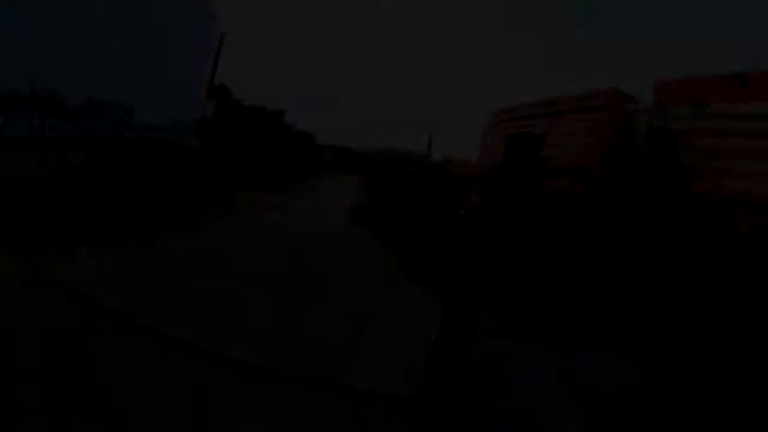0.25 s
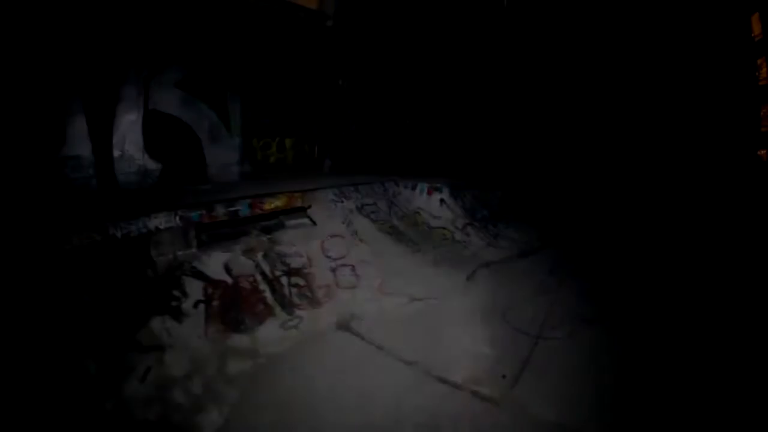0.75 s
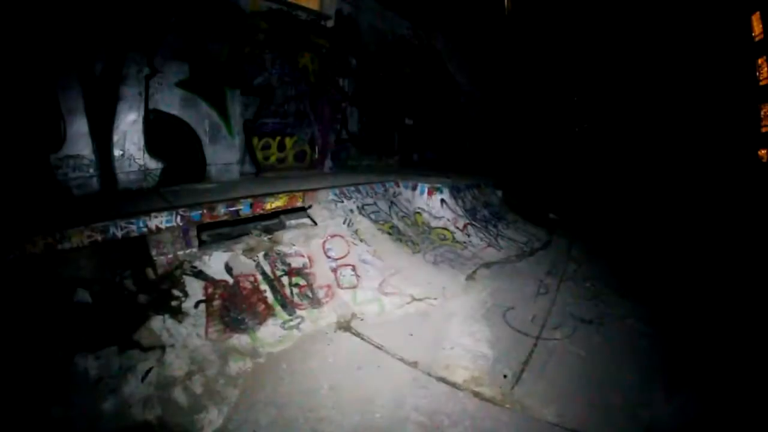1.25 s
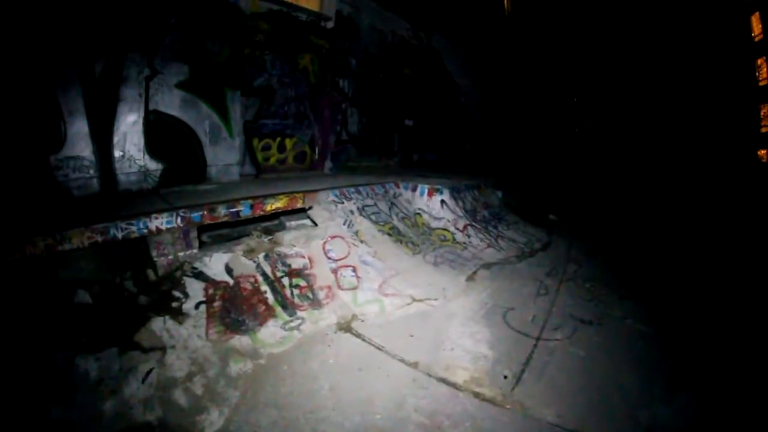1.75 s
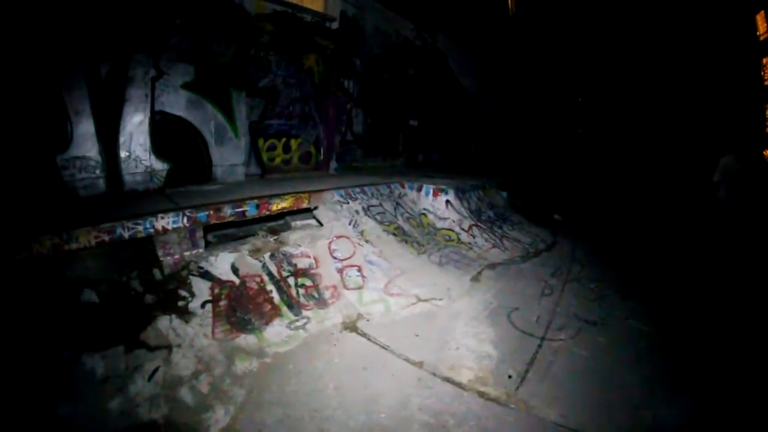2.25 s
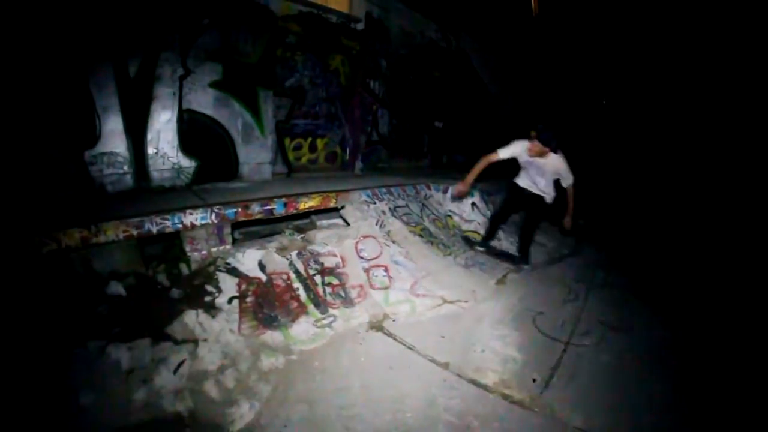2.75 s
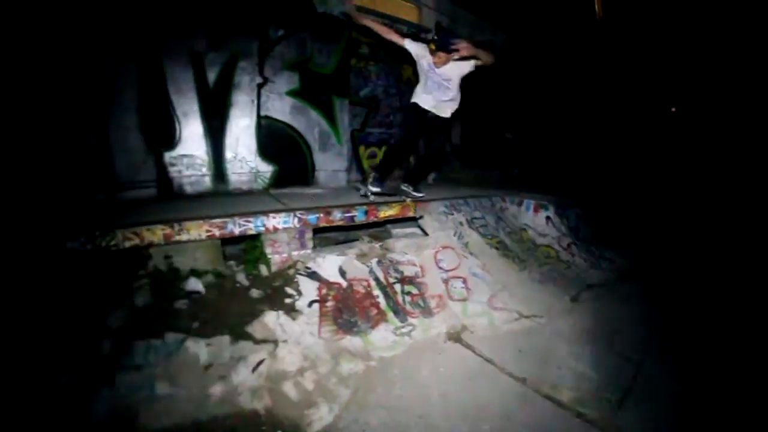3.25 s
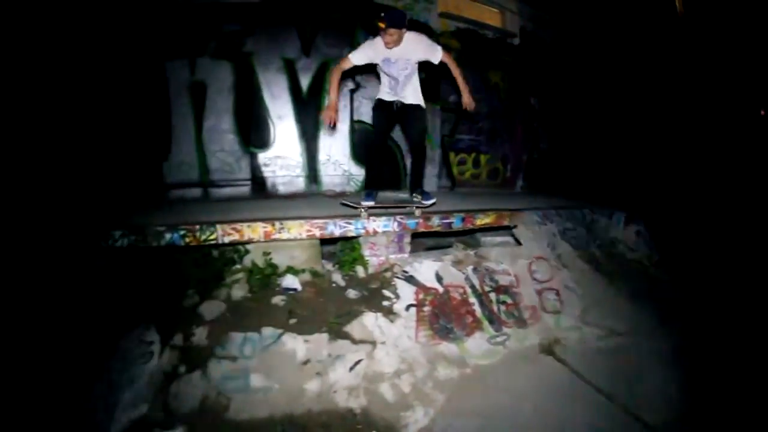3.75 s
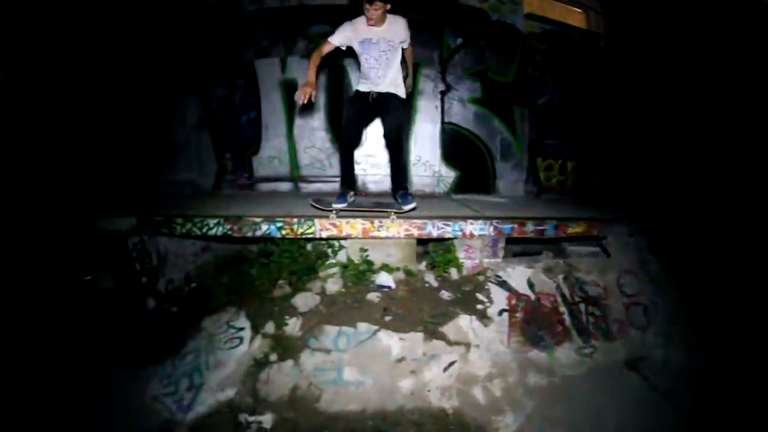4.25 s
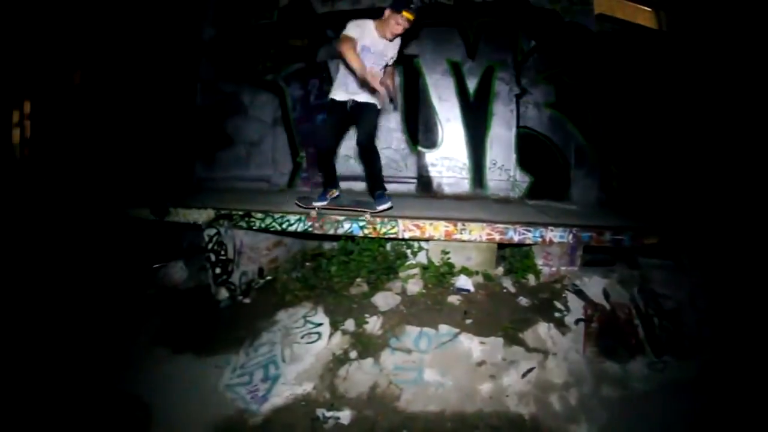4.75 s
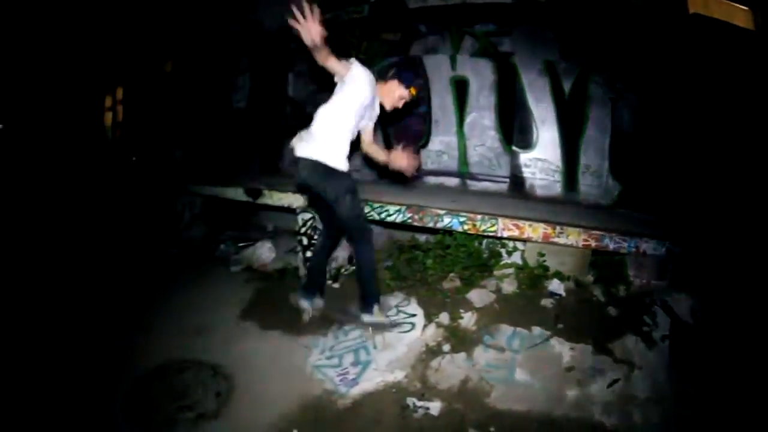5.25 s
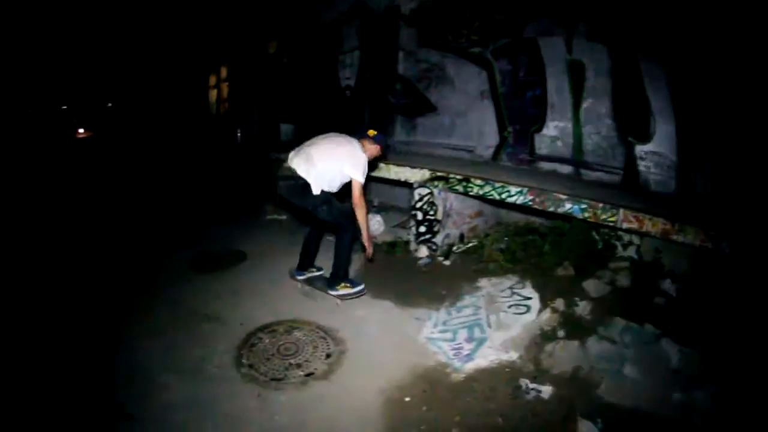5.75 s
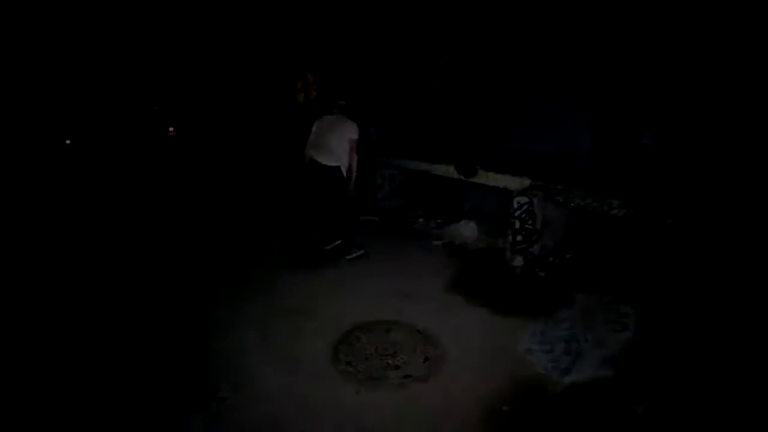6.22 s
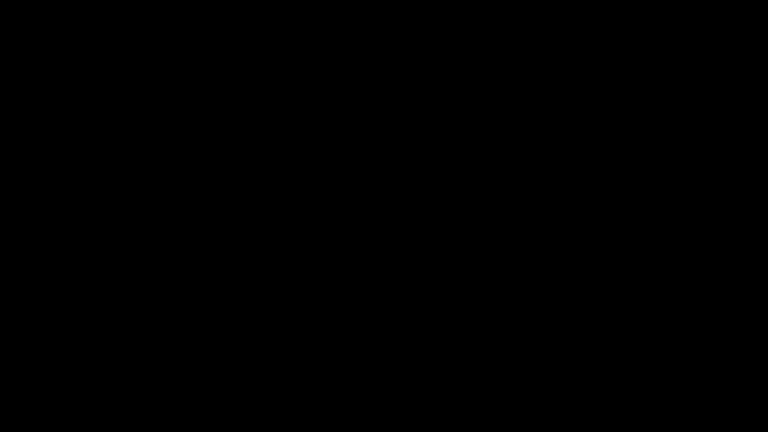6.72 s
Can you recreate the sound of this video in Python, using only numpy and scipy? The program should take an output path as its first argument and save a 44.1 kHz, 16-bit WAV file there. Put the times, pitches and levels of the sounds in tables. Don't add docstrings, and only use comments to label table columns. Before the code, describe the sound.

A faint town hum, wind buffets and dry grass crackle open the sound, dropping nearly silent around 0.45 s with a tiny rattle. Quiet air returns. From 1.25 to 1.6 s a skateboard is handled and set down: short shoe scuffs, metallic ticks and woody knocks. Wheels then rumble over rough concrete, hollow and plank-like, growing steadily closer; knocks and jolts thicken from 2.35 to 3 s up a bank. At 3.2 s two sharp clacks strike the ledge, another pair at 3.45 s, then much quieter gritty rasp, light ticks and flicked stones until 4.8 s. Clicks and a skid at 4.85-5.1 s lead to a near-quiet flight. At 5.37 s a very loud cluster of wooden and metallic cracks lands with low thuds. Rough rolling continues, softer, with clacks near 6.15 and 6.28 s, fading out by 6.6 s. Close single microphone, short wall echo.

```python
import sys
import numpy as np
from scipy import signal
from scipy.fft import rfft, irfft, next_fast_len
from scipy.io import wavfile
from scipy.ndimage import uniform_filter1d, map_coordinates

SR = 44100
rng = np.random.default_rng(int(sys.argv[2]) if len(sys.argv) > 2 else 0)


def transcribe(signal):
    frames = np.atleast_2d(signal).T
    limited = np.clip(frames, -1, 1)
    pcm = np.round(limited * 32767).astype(np.int16)
    wavfile.write(sys.argv[1], SR, pcm)


def voltage_ratio(level):
    return 10 ** (np.asarray(level, float) / 20)


N = 307906
TIME_S = np.arange(N) / SR

# pitch_hz, width_hz, level_db
DECK_MODES = [(182, 140, -4), (283, 122, 0.5), (592, 200, 0), (880, 130, 4.5), (1150, 235, 2),
              (1433, 614, -1)]
# pitch_hz, level_db (per Hz)
HISS_COLOUR = [(3240, -46.5), (5500, -12.5), (8560, -2.5), (12600, 1.5), (14500, 0), (15500, -33.5)]


def unit(x):
    return x / np.sqrt(np.mean(x ** 2) + 1e-20)


def along(points, hz):
    point_hz, value = np.transpose(points)
    return np.interp(np.log(hz + 1), np.log(point_hz + 1), value)


def curves(rows):
    s, *columns = np.transpose(rows)
    return [np.interp(TIME_S, s, column, left=-150, right=-150) for column in columns]


def wobble(rate):
    knots = rng.standard_normal(int(N * rate / SR) + 4)
    return map_coordinates(knots, [np.arange(N) * rate / SR])


def coloured(x, spectrum):
    size = next_fast_len(len(x) + 8192)
    gain = voltage_ratio(along(spectrum, np.fft.rfftfreq(size, 1 / SR)))
    return unit(irfft(rfft(x, size) * gain, size)[:len(x)])


def ringing(f, modes):
    return sum((-1) ** k * voltage_ratio(db) * 1j * f * width / (hz * hz - f * f + 1j * f * width)
               for k, (hz, width, db) in enumerate(modes))


def rung(x, modes):
    size = next_fast_len(len(x))
    answer = ringing(np.fft.rfftfreq(size, 1 / SR), modes)
    return unit(irfft(rfft(x, size) * answer, size)[:len(x)])


def gravel(spike_db, lump_db, rate):
    stones = voltage_ratio(spike_db * np.minimum(rng.exponential(size=N), 5))
    return rng.standard_normal(N) * stones * voltage_ratio(lump_db * wobble(rate))


def rolling():
    # start_s, strength_db, rider_load_db
    stages = [
        [(1.248, -48, -20), (1.31, -60, 4), (1.42, -56, -22), (1.476, -43, 20), (1.57, -61.5, 23)],
        [(1.57, -47.5, -2), (1.69, -46.5, 4.5), (1.93, -44.5, 0), (2.17, -42.5, 6), (2.35, -40.5, 9.5)],
        [(2.35, -39, -18), (2.43, -46.5, -26), (2.47, -40.5, 4), (2.66, -35, 4), (2.75, -41.5, 7.5),
         (2.82, -36.5, 10), (2.97, -42, 14), (3.1, -47.5, 2.5), (3.2, -42.5, -13)],
        [(3.2, -39.5, -16), (3.31, -59, -20), (3.46, -53.5, 3), (3.82, -53, 4), (3.96, -57, 5),
         (4.32, -56.5, 2.5), (4.68, -61, 7.5), (4.9, -54.5, 4.5), (5.06, -60.5, -10)],
        [(5.06, -58, -9), (5.2, -64.5, -16), (5.41, -62.5, 36)],
        [(5.41, -37.5, 6), (5.54, -52, 5), (5.59, -42.5, 4.5), (5.74, -51.5, 7.5), (5.87, -58, 8),
         (6.13, -56, 1.5), (6.35, -48.5, 1), (6.45, -51.5, 3), (6.557, -53.5, -1)],
    ]
    # boom_db, rasp_db, hiss_db, low_song_db, high_song_db
    ground = [
        (-28, -2.5, -3, -33, -20),
        (-7, -8.5, -8.5, -14, -0.5),
        (-7.5, -4, -4, -17.5, -13),
        (-13, 0, 4, 0.5, -2),
        (-17.5, 5.5, 4.5, -14.5, -13.5),
        (-6.5, -2, 4, -10.5, -10.5),
    ]
    # time_s, swell_db
    ridges = [(2.15, 7.5), (2.34, 0), (2.49, 3), (2.555, 3), (2.595, -1), (2.62, 0.5), (2.643, 4),
              (2.708, 6.5), (2.745, 6), (2.777, 9), (2.834, 6), (2.855, 1.5), (2.941, 0), (2.975, 4),
              (3.02, 4.5), (3.501, 4), (3.605, 1.5), (3.637, -3), (3.662, -4.5), (3.69, 2), (3.735, 7),
              (3.881, -0.5), (3.975, 4), (4.02, -4.5), (4.092, -4.5), (5.577, -4), (5.625, 1.5),
              (6.157, 10), (6.294, 11)]
    axles_follow, bearings_follow, load_damps = 0.61, 0.55, 0.067
    ridge_s, deck_feels = 0.019, 0.55
    fade_s, fade_db_per_s2 = 6.435, 1589

    levels = np.full((6, N), -150.)
    for rows, (boom, rasp, hiss, low, high) in zip(stages, ground):
        db, load = curves(rows)
        on = db > -150
        mean = db[on].mean()
        swing = db - mean
        rasp_db = mean + rasp + axles_follow * swing
        hiss_db = mean + hiss + bearings_follow * swing - load_damps * load
        stage = np.array([db + boom + load, db, rasp_db, hiss_db, db + low + load, db + high])
        levels[:, on] = stage[:, on]
    fade = fade_db_per_s2 * np.clip(TIME_S - fade_s, 0, None) ** 2
    jolt = sum(db * np.exp(-((TIME_S - s) / ridge_s) ** 2) for s, db in ridges)
    share = np.array([[deck_feels], [deck_feels], [1], [1], [0], [0]])
    return uniform_filter1d(levels, size=300, axis=1) - fade + share * jolt


def wheels():
    # pitch_hz, level_db (per Hz)
    boom_colour = [(41, -43.5), (70, -17), (150, -0.5), (225, -1), (295, 3), (364, -4), (420, -12.5),
                   (550, -32), (920, -120)]
    body_colour = [(180, -35.5), (300, 1.5), (405, 1.5), (496, 4.5), (606, -2), (963, 7), (1180, -9),
                   (1900, -15), (2470, -42.5), (4180, -120)]
    rasp_colour = [(820, -14.5), (1400, -1), (1890, -6.5), (2400, -13), (3200, -14), (4400, -14),
                   (6500, -12.5), (8450, -32.5), (14300, -120)]
    # pitch_hz, width_hz, level_db
    axle_modes = [(3130, 1400, 0)]

    boom_db, body_db, rasp_db, hiss_db = rolling()[:4]
    bumps = 2 * wobble(50) + 0.7 * wobble(18)
    drive = gravel(spike_db=2, lump_db=1.0, rate=66)
    body = unit(0.57 * rung(drive, DECK_MODES[2:]) + 0.63 * coloured(drive, body_colour))
    boom = coloured(gravel(spike_db=-1.5, lump_db=3.5, rate=38), boom_colour)
    rasp = coloured(gravel(spike_db=2.5, lump_db=2.5, rate=750), rasp_colour)
    rasp = unit(rasp + 0.17 * rung(rung(rasp, axle_modes), axle_modes))
    hiss = coloured(gravel(spike_db=4.5, lump_db=2.5, rate=350), HISS_COLOUR)

    out = voltage_ratio(boom_db - 4.5 + 0.17 * bumps) * boom
    out += voltage_ratio(body_db - 1.3 + 0.43 * bumps) * body
    out += voltage_ratio(rasp_db - 5.0 + 0.82 * bumps + 2.0 * wobble(140)) * rasp
    out += voltage_ratio(hiss_db - 6.0 + 0.43 * bumps) * hiss
    return out


def song(hz, width_hz, lump_db):
    lowpass = signal.butter(2, width_hz / 2, fs=SR, output="sos")
    slow = signal.sosfilt(lowpass, rng.standard_normal((2, N)))
    turn = 2 * np.pi * np.cumsum(hz * (1 + 0.045 * wobble(12))) / SR
    lumps = voltage_ratio(lump_db * wobble(14) + 0.84 * wobble(3.1))
    return unit(lumps * (slow[0] * np.cos(turn) + slow[1] * np.sin(turn)))


def deck():
    # time_s, pitch_hz
    stance = [(1.569, 739), (1.719, 669), (1.999, 643), (2.15, 608), (2.3, 560), (2.421, 550), (2.5, 624),
              (2.8, 523), (3.07, 610.6), (3.5, 610), (3.8, 635), (4.2, 615), (4.6, 570), (5.298, 631.5),
              (5.451, 858), (6.6, 878)]
    low_db, high_db = rolling()[4:]
    high_hz = np.interp(TIME_S, *np.transpose(stance))
    low_song = voltage_ratio(low_db - 4.0) * song(184, width_hz=95, lump_db=4.5)
    return low_song + voltage_ratio(high_db - 1.5) * song(high_hz, width_hz=95, lump_db=0.5)


def board(s):
    # pitch_hz, width_hz, level_db
    free = [(1787, 250, 12.5), (2433, 260, 4), (3200, 610, 0), (4200, 550, 0.5), (5950, 1560, -1)]
    carried = [(1700, 500, 7), (2470, 1830, 5), (2630, 2660, 4.5), (4240, 13000, -13.5)]
    pressed = [(1580, 290, 8.5), (2380, 200, 3), (3300, 510, -5), (4200, 330, 1.5), (5240, 410, 0),
               (7100, 470, 1.5)]
    landed = [(1583, 180, 7.5), (2330, 250, 5), (2850, 300, 5), (3700, 330, 2.5), (4760, 760, -1.5),
              (6700, 720, 4.5)]
    changes = [
        1.55,
        3.22,
        3.3,
    ]
    if np.searchsorted(changes, s) % 2 == 0:
        return carried, DECK_MODES[1:2] + DECK_MODES[3:]
    if s > 5.35:
        return landed, DECK_MODES
    return (pressed if 3.4 < s < 5.0 else free), DECK_MODES


def contact(envelope, db, deck_db, grit_db, hz, axles, plank, needle=0):
    # pitch_hz, level_db (per Hz)
    grit_colour = [(3240, -35.5), (5500, -22), (6850, 9), (9010, 10), (13000, 12.5), (15300, 12),
                   (16400, -22.5)]

    def vary(modes):
        return [(c * (1 + rng.normal(0, 0.03)), w, g + rng.normal(0, 1.5)) for c, w, g in modes]

    f = np.fft.rfftfreq(len(envelope), 1 / SR)
    push = rfft(envelope * rng.standard_normal(len(envelope)))
    push = push / np.sqrt(uniform_filter1d(np.abs(push) ** 2, size=70))
    edge = f * f / (f * f + 1500 ** 2)
    wood = ringing(f, vary(plank))
    steel = ringing(f, vary(axles)) * edge / (1 + (f / 7000) ** 4)
    struck = ringing(f, [(hz, 0.1 * hz, 8)])
    if hz < 1600:
        wood = wood + struck
    else:
        steel = steel + struck
    hard = push + needle * np.exp(-2j * np.pi * f * 0.0056)
    parts = [irfft(h) for h in (hard * wood, hard * steel, push * voltage_ratio(along(grit_colour, f)))]
    peaks = [np.sqrt(np.max(uniform_filter1d(p ** 2, size=180))) for p in parts]
    return sum(voltage_ratio(db + rel) * p / top for p, top, rel in zip(parts, peaks, (deck_db, 0, grit_db)))


def knocks():
    # start_s, axle_db, deck_rel_db, grit_rel_db, struck_hz
    joints = [(3.2002, -27.5, 1, -9, 1040), (3.2073, -28.5, 1.5, -1.5, 5060), (3.4457, -29, -2, 1.5, 1025),
              (3.4538, -32, 1.5, 0, 5240), (3.7079, -42, 6, 9, 983), (3.7175, -34, -0.5, 3, 4200),
              (3.939, -42, 8.5, 2.5, 767), (3.948, -46.5, 15.5, -3, 534), (4.9317, -45, 3.5, 7, 1300),
              (4.9387, -34, -4, -7, 598), (6.2823, -45.5, 5, 0, 552), (6.2883, -40, 5.5, -9, 513)]
    blows = [(0.0542, -49, 0.5, -4, 447), (1.073, -65, 4, -25, 2440), (1.2555, -41, -1, -17, 1600),
             (1.333, -44, 11, -32, 1030), (1.5745, -54, 19.5, -21, 780), (2.13, -58, 25, -10, 610),
             (2.141, -41, -2, -22, 2146), (2.152, -52, 18, -8, 1150), (2.356, -52.5, 15, -1, 563),
             (2.204, -50.5, 10.5, -1, 507), (2.6095, -41.5, 8.5, -8, 1150), (2.7718, -33.5, 4, -22, 535),
             (2.832, -34, -29, -22, 965), (2.9379, -45, 11, 5, 1090), (2.9632, -52.5, 17, 6, 677),
             (3.316, -52, 4, -7, 1300), (3.3385, -50.5, 5, 11.5, 489), (3.41, -55, -7, 16.5, 610),
             (4.2181, -46.5, 6.5, -30, 506), (4.8435, -48, 10, 8, 780), (4.848, -42.5, 2.5, -4, 2200),
             (5.0405, -38, -8, -22, 2960), (5.1145, -49, -18, -8, 2250), (5.473, -45.5, -3, -4, 880),
             (5.5054, -47.5, 11, -6, 700), (5.539, -50, -12, -14, 3080), (6.1511, -46.5, -5, 10.5, 880),
             (6.1603, -46, -3, 6, 855)]
    landing = [(5.3675, -22, 4.5, 3, 1290), (5.3779, -27, -4, -11.5, 2450), (5.3822, -33, 16, -14, 903),
               (5.3883, -25, -9.5, -4.5, 4840), (5.4, -28, 8.5, 1, 700), (5.405, -20, 6, 1, 1170),
               (5.4143, -31, 8.5, -6, 590)]
    ticks = [(1.277, -42.5, -1, -23, 1450), (1.379, -46, 5, -13, 1160), (1.579, -49.5, 5, -15, 800),
             (1.594, -44.5, 15, -8, 700), (1.601, -44, 7, 0, 3300), (2.04, -68, 1, -8, 1550),
             (2.088, -53, 0, -6, 3200), (2.463, -46.5, -4, -10, 2100), (2.638, -39.5, 4, -12, 2750),
             (2.648, -44, 0, -10, 3500), (2.703, -38, -3, -6, 2040), (2.745, -42, 0, 0, 9500),
             (2.845, -39, 2, -11, 1200), (3.177, -48.5, 9, 3, 945), (3.188, -52, 7, 1, 910),
             (3.195, -50, 2, 6, 7000), (3.231, -49, 10, 6, 6030), (3.325, -46, -11, -6, 5600),
             (3.419, -46.5, 8, 2, 700), (3.7102, -44.5, 11.5, 6, 700), (3.7253, -43, 5.5, 0, 5590),
             (3.738, -46, 4, -6, 4340), (3.941, -41, 4, -3, 3300), (3.9565, -50, 11, 6, 3300),
             (3.9715, -53, 5, -8, 1700), (4.851, -52, 4, -3, 820.6), (4.946, -45.5, 7, 0, 6460),
             (5.37, -33, 4, -5, 2950), (5.4068, -20.5, 7, -4, 2330), (5.435, -44, -2, -10, 3100),
             (2.153, -57, 2, -2, 5500), (2.171, -50, 6, -9, 3200), (2.226, -53, -6, 0, 3200),
             (2.555, -46, 4, -8, 2950), (2.79, -38, 4, -9, 2000), (2.984, -49, 7, 0, 1460),
             (5.575, -61, 15, -10, 1306), (5.608, -58, 5, -6, 2204), (5.88, -59, 2, 0, 2800)]
    # start_s, level_db
    stones = [(0.1146, -64), (0.1323, -65), (0.203, -68), (3.503, -48.5), (3.613, -51.5), (3.855, -55.5),
              (3.6754, -57), (4.1928, -55.5), (4.327, -61), (4.4232, -54), (4.6044, -52), (4.6628, -54),
              (4.7806, -58), (4.9813, -52.5), (5.525, -66), (5.547, -52), (5.624, -46.5), (5.668, -61),
              (5.845, -61), (5.876, -58), (6.2458, -53), (6.402, -60), (6.4538, -54), (6.495, -58)]
    out = []
    for rows, die_away_s in ((joints, 0.038), (blows, 0.064), (landing, 0.037), (ticks, 0.018)):
        out += [(*row, die_away_s) for row in rows]
    for s, db in stones:
        out.append((s, db, 1, 5, 700 * voltage_ratio(rng.normal(0, 1.7)), 0.042))
    return out


def contacts():
    # start_s, axle_db, deck_rel_db, struck_hz, length_s
    scuffs = [(1.2494, -46, 3, 1480, 0.016), (1.264, -39, -28, 3200, 0.018), (1.271, -40, -15, 1790, 0.017),
              (1.33, -38, -15, 1050, 0.024), (1.348, -31.5, -7, 2750, 0.014),
              (1.375, -41.5, 8, 1090, 0.011), (1.392, -33.5, -3.5, 1150, 0.018),
              (1.437, -50, 13, 1120, 0.01), (1.45, -37.5, 0.5, 2470, 0.023), (1.486, -45, 4, 1230, 0.023),
              (1.5697, -50, 19, 623, 0.04), (1.584, -39, -11, 3130, 0.038), (1.607, -44.5, 5.5, 890, 0.026),
              (2.361, -64, 18, 547, 0.043), (3.0546, -42, 6.5, 620, 0.029),
              (3.165, -48.5, 12.5, 830, 0.025), (3.229, -50, 6, 1045, 0.017),
              (3.238, -44.5, -8, 2690, 0.025), (3.273, -48, -9, 2470, 0.019),
              (3.264, -45.5, -0.5, 1310, 0.081), (3.331, -45.5, 8, 473, 0.016),
              (3.406, -49.5, 13, 563, 0.016), (4.842, -51, 2, 780, 0.018),
              (5.0392, -39.5, -10.5, 1600, 0.024), (5.1128, -41, -0.5, 1150, 0.016),
              (5.361, -29, 0, 700, 0.033), (5.417, -45, -7, 3200, 0.049)]
    out = np.zeros(N + SR)
    t = np.arange(6144) / SR - 0.005
    lead = round(0.005 * SR)
    after = np.clip(t, 0, None)
    for s, db, deck_db, grit_db, hz, die_away_s in knocks():
        chatter_db = 2.1 * np.minimum(rng.exponential(size=len(t) // 40 + 1), 3)
        rattle = voltage_ratio(chatter_db - 60 * after[::40] / np.clip(die_away_s, 0.004, 0.3))
        rattle = np.repeat(rattle, 40)[:len(t)]
        crack = voltage_ratio(-60 * after / 0.0028)
        blow = (1 - np.exp(-after / 0.00047)) * (0.071 * rattle + crack)
        hit = contact(blow, db + 0.074, deck_db, grit_db - 0.5, hz, *board(s), needle=1.3)
        out[round(s * SR) - lead:][:len(t)] += hit
    for s, db, deck_db, hz, length in scuffs:
        grit_db = -41 if s < 1.58 else -11 if s < 1.7 else -6.5
        u = after / length
        stroke = u ** 0.3 * np.exp(-1.2 * u ** 3) * voltage_ratio(1.9 * rng.exponential(size=len(t)))
        scrape = contact(stroke, db + 0.35, deck_db, grit_db, hz, *board(s))
        out[round(s * SR) - lead:][:len(t)] += scrape
    return out[:N]


def thuds():
    # start_s, level_db, pitch_hz
    bends = [(1.579, -51, 126), (2.04, -41, 117), (2.659, -33, 282), (2.81, -29, 305), (3.335, -43, 213),
             (3.471, -44, 176.8), (3.591, -48.5, 186), (3.717, -41, 173), (4.321, -42, 182),
             (4.605, -42, 191), (4.939, -36.5, 271), (4.983, -58, 280), (5.367, -19.5, 298),
             (5.372, -29.5, 207.8), (5.4, -26.5, 206), (5.387, -29, 278), (5.4, -18.5, 283)]
    out, t = np.zeros(N), np.arange(SR // 2) / SR
    for s, db, hz in bends:
        cycles = hz * t
        level = voltage_ratio(db + 1.0 - 60 * cycles / 28)
        rise = 1 - np.exp(-cycles / 0.4)
        out[round(s * SR):][:len(t)] += level * rise * np.sin(2 * np.pi * cycles)
    return out


def wall(x):
    # pitch_hz, die_away_s (by 60 dB)
    echo_times = [(200, 0.028), (1000, 0.32), (3000, 0.17), (12000, 0.076)]
    out, hop = np.zeros(N + SR), SR // 4
    for start in range(0, N, hop):
        hz, t, z = signal.stft(rng.standard_normal(SR // 3), SR, nperseg=256)
        decay = voltage_ratio(-60 * t / along(echo_times, hz)[:, None])
        tail = signal.istft(z * decay, SR, nperseg=256)[1]
        wet = signal.fftconvolve(x[start:start + hop], tail / np.linalg.norm(tail))
        out[start + 400:][:len(wet)] += wet
    return out[:N]


def scene_changes():
    # start_s, level_db
    bursts = [
        (0.464, -59.5),
        (6.715, -73),
    ]
    # pitch_hz, width_hz, level_db
    rattle_modes = [(330, 300, -8), (754, 88, 0), (1670, 93, 2), (1890, 50, -8), (2620, 90, -12),
                    (3750, 100, -18), (5810, 140, -20)]
    gate = sum(voltage_ratio(db - 300 * (TIME_S - s)) * (TIME_S > s) * (TIME_S < s + 0.021) for s, db in bursts)
    return gate * rung(rng.standard_normal(N), rattle_modes)


def crackle():
    # start_s, level_db
    snaps = [(0.012, -56), (0.035, -68), (0.075, -61), (0.085, -66), (0.163, -70), (0.182, -69),
             (0.218, -72), (0.232, -68), (0.245, -71), (0.259, -75), (0.307, -72), (0.324, -68),
             (0.357, -80), (0.385, -79)]
    envelope, t = np.zeros(N), np.arange(SR // 20) / SR
    for s, db in snaps:
        envelope[round(s * SR):][:len(t)] += voltage_ratio(db - 60 * t / 0.017)
    return envelope * coloured(rng.standard_normal(N), HISS_COLOUR)


def air():
    # time_s, level_db
    hum = [
        [(0.0, -61), (0.09, -69), (0.29, -72.5), (0.4, -76), (0.49, -100)],
        [(0.492, -100), (0.55, -84), (0.672, -75), (1.156, -72.5), (1.26, -74.5)],
    ]
    # time_s, level_db
    wind = [(0, -66), (.13, -70), (.26, -58), (.49, -87), (.62, -70), (1.9, -68.5), (2.25, -69), (2.7, -67),
            (3.6, -63), (4.4, -69), (4.78, -64), (5.05, -64), (5.28, -66.5), (5.55, -66.5), (6.15, -72.5),
            (6.36, -66), (6.5, -73), (6.74, -93)]
    # pitch_hz, level_db (per Hz)
    gust_colour = [(12, -37.5), (20, -12.5), (27, -14), (48, -0.5), (110, -8), (140, -49), (240, -120)]
    town_colour = [(59, -38), (100, -12), (198, -12.5), (319, -17), (642, -16.5), (692, -17), (1150, -16),
                   (3500, -37.5), (4550, -36), (7700, -120)]
    rustle_colour = [(1470, -17), (2500, -2.5), (3610, -7.5), (4710, -9), (13500, -12), (14500, -18)]
    rustle_rel_db = [-9.5, -11.5]
    rustle_dies_s = [0.16, 0.03]

    thump = voltage_ratio(-67 - 60 * (TIME_S - 5) / 0.11) * (TIME_S > 5)
    gusts = voltage_ratio(curves(wind)[0] + 1.8 * wobble(7.6))
    out = (gusts + thump) * coloured(rng.standard_normal(N), gust_colour)
    for rows, rel_db, dies_s in zip(hum, rustle_rel_db, rustle_dies_s):
        town_db, = curves(rows)
        rustle_db = town_db + rel_db + 9 * np.exp(-np.abs(TIME_S - rows[0][0]) / dies_s)
        out += voltage_ratio(town_db + 2.9 + 0.7 * wobble(15)) * coloured(rng.standard_normal(N), town_colour)
        out += voltage_ratio(rustle_db + 2.0 * wobble(39.5)) * coloured(rng.standard_normal(N), rustle_colour)
    last_db = np.interp(TIME_S, [6.5, 6.54, 6.72, 6.735], [-150, -80.0, -93.5, -150])
    return out + voltage_ratio(last_db) * coloured(rng.standard_normal(N), town_colour)


def scene():
    steady = wheels() + deck() + air() + scene_changes() + crackle()
    hits = contacts() + thuds()
    mono = hits + voltage_ratio(-15) * wall(hits) + steady
    return np.array([mono, mono])


def low_pass(x):
    return signal.sosfilt(signal.butter(12, 16640, fs=SR, output="sos"), x)


def record(dry):
    # start_s, end_s, level_db
    dips = [
        (5.347, 5.3684, -14),
    ]
    f = np.fft.rfftfreq(N, 1 / SR)
    dip_db = sum(db * (TIME_S > start) * (TIME_S < end) for start, end, db in dips)
    dipped = dry * voltage_ratio(uniform_filter1d(dip_db, size=40))
    top = voltage_ratio(along([(14600, -2.5), (15100, -9.0), (15350, -24), (16400, -17.5), (16700, -95.5)], f))
    apart = voltage_ratio(along([(1500, -79.5), (3000, -45.0), (10000, -42.5), (13000, -19.5)], f))
    apart = apart * [[1j], [-1j]]
    mix = irfft(rfft(dipped) * top * (1 + apart), N)
    return low_pass(mix)


dry = scene()
out = record(dry)
transcribe(out)
```